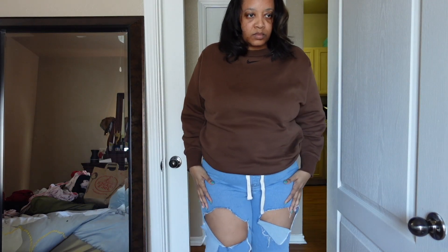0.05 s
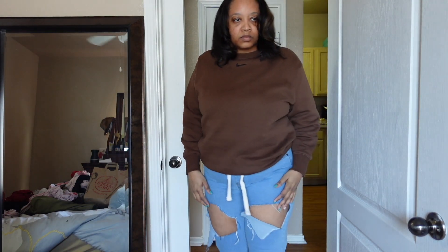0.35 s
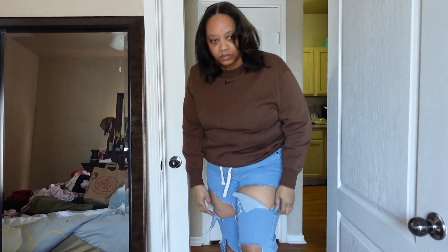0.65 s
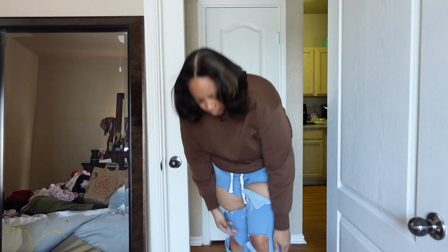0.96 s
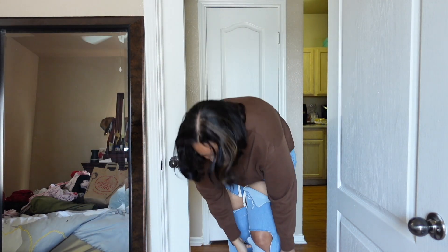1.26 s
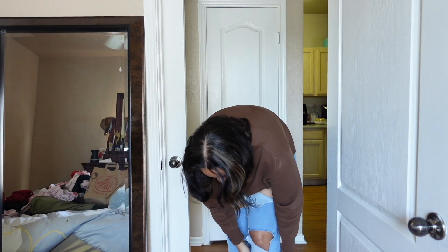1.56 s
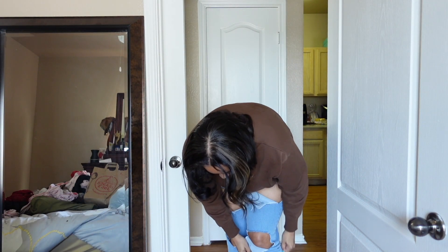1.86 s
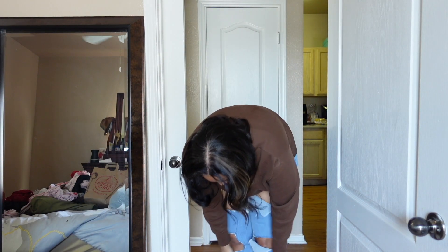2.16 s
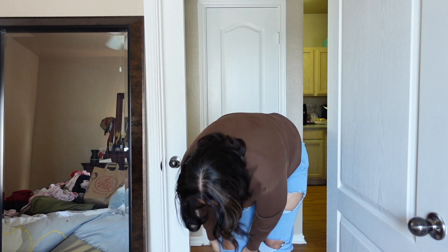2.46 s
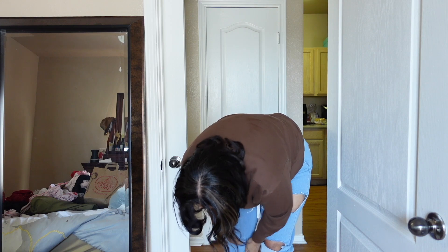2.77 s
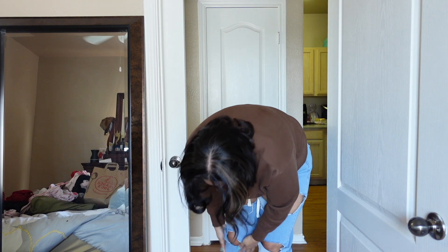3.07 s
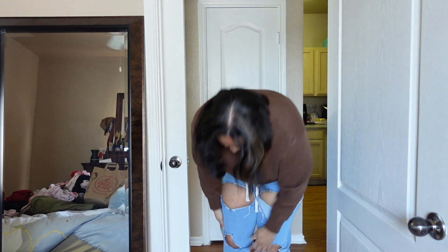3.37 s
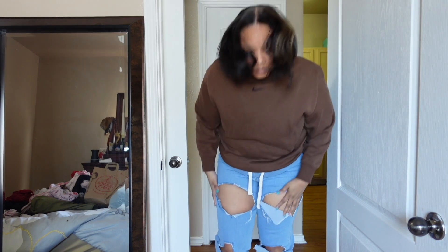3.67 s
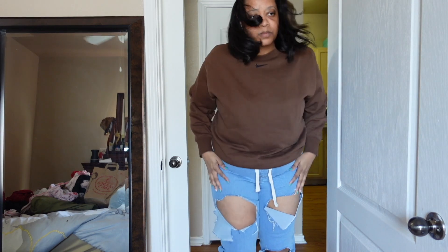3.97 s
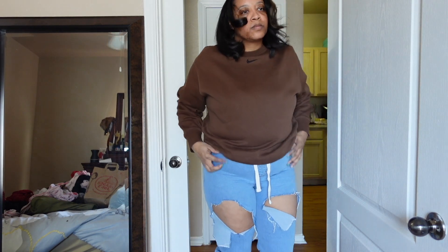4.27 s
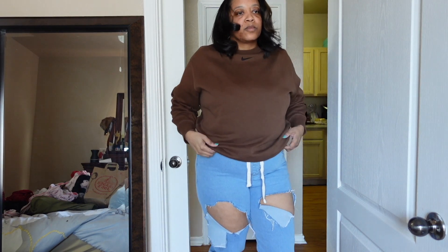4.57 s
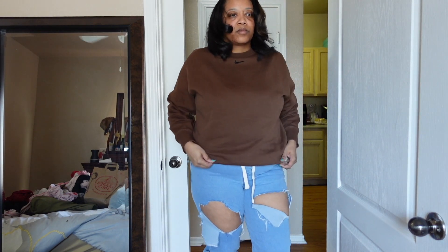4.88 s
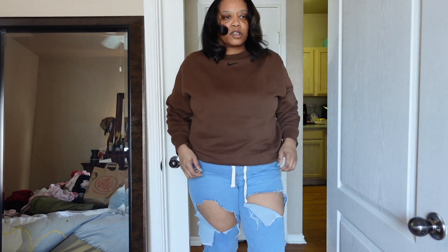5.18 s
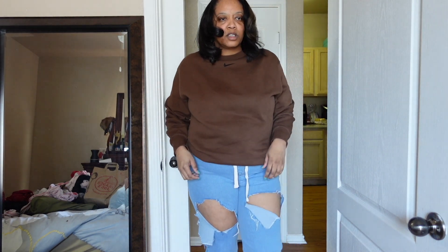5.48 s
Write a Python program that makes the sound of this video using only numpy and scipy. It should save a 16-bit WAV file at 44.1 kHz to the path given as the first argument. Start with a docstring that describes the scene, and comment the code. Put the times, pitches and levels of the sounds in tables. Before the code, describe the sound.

A brisk, loud swish of stiff fabric comes right at the start. Cloth keeps rubbing on cloth through the first second, with a crisp little snap of a fold at about 0.6 seconds. Someone in a sweatshirt and jeans bends and handles the trouser legs: loose cloth flaps near 1.4 seconds, and stronger rubs come around 1.8 and 2.8 seconds. A few faint, light knocks are scattered between 1.5 and 3.1 seconds. From about 3.4 to 4.5 seconds the rustling is fuller and more continuous, with airy swells of fabric hiss, ending in two small ticks. It dies down, and at about 5.1 seconds there is one sharp, wet click, like a tongue click or lip smack. A faint knock and a soft rustle follow around 5.5 seconds. A quiet, steady fan-like hiss lies underneath, and the small room adds a short echo.

```python
"""Cloth swishes and rubs as someone in a sweatshirt and jeans bends, handles the trouser legs and stands.
The rubbing is thousands of tiny clicks from threads catching and slipping. Loose cloth flaps, folds snap,
breath-like hiss swells and a few soft knocks ring. Near the end, tiny quick pops make one sharp, wet
click, like a tongue click or lip smack.
The walls of the small room answer briefly, and a fan-like hiss lies under it all."""
import sys
import numpy as np
from scipy import signal
from scipy.fft import rfft, irfft, next_fast_len
from scipy.io import wavfile
from scipy.ndimage import map_coordinates

SR = 44100
rng = np.random.default_rng(int(sys.argv[2]) if len(sys.argv) > 2 else 0)


def store_pcm(level_fs):
    """Save levels as 16-bit WAV."""
    pcm = np.round(np.clip(level_fs, -1, 1) * 32767).astype(np.int16)
    wavfile.write(sys.argv[1], SR, np.atleast_2d(pcm).T)


N = 248283

# Tone colours, or how strong each pitch is next to the others: pitch_hz, level_db
FAN_COLOUR = [(30, -41), (80, -22.5), (130, -15), (250, -13), (450, -8), (660, -3.5), (800, -5.5),
              (1100, 4), (1600, 2.5), (2200, -2), (2600, -6), (4500, -7), (9000, -12.5), (15800, -21)]  # steady room noise
SWISH_COLOUR = [(150, -67), (600, -18.5), (1100, -12), (1800, -8.5), (2300, -4), (2620, 1), (2850, -2),
                (3200, 0.5), (4200, -2), (5000, -10.5), (7200, -16), (10000, -24), (15500, -44)]  # stiff fabric swept briskly
SWISH_BODY_COLOUR = [(50, -48), (150, -26), (280, -15.5), (380, -6.5), (520, -0.5), (660, -5), (750, 10),
                     (860, -9), (1100, -2), (1600, -12), (6000, -50)]  # the hollow sound under that sweep
RUB_COLOUR = [(250, -69), (600, -36), (900, -21.5), (1300, -7), (1900, -0.5), (2900, -2.5), (4500, -5),
              (6500, -12.5), (9000, -23), (13000, -37)]  # cloth on cloth
FIBRE_COLOUR = [(500, -63), (3000, -1), (5500, -3), (7500, -3.5), (10000, -8), (13000, -12.5),
                (16000, -20.5)]  # taut fabric hissing
FLAP_COLOUR = [(50, -46), (140, -45), (280, -14.5), (450, -14.5), (700, 3), (1100, 1), (1600, 5.5),
               (2600, -1), (8000, -47)]  # loose fabric flapping

# Clothes shifting faintly as the body moves, resting just before the click: time_s, level_db
SHIFTING = [(0.3, -60), (0.7, -62.5), (1.1, -63), (1.3, -64), (2.5, -62.5), (3.05, -66), (4.3, -60),
            (4.85, -74), (5.05, -82), (5.36, -66.5), (5.63, -87)]
# Strokes of cloth on cloth: peak_s, rise_s, fall_s, rub_db, hiss_above_rub_db
STROKES = [(0.19, 0.059, 0.2, -49.5, -32), (0.42, 0.065, 0.064, -53.5, -14), (0.53, .05, 0.07, -48.5, -11),
           (0.635, 0.074, 0.034, -45, -11.5), (0.78, .022, 0.062, -49, -9.5), (0.93, 0.12, .17, -65, -1),
           (1.48, 0.096, 0.07, -64.5, 4), (1.72, 0.089, 0.084, -49.5, -2), (1.815, 0.071, 0.057, -49, -2),
           (2.0, .035, 0.05, -57.5, -11), (2.085, 0.049, .1, -57, -21), (2.29, 0.12, 0.28, -55.5, -12.5),
           (2.56, 0.12, 0.11, -59.5, 0), (2.825, 0.082, 0.075, -48, -1.5),
           (2.945, 0.025, 0.04, -51.5, -6.5), (3.2, 0.094, 0.075, -59.5, -1.5),
           (3.39, 0.091, 0.18, -56.5, 0), (3.51, .04, 0.056, -49, -5), (3.59, 0.083, 0.085, -47, -5),
           (3.73, 0.13, 0.11, -54.5, 0.5), (3.9, 0.11, 0.075, -56, 3.5), (4.11, 0.2, 0.1, -52.5, -5.5),
           (4.29, 0.15, .11, -51, -5), (4.47, 0.16, .05, -54.5, -18), (4.73, 0.16, 0.16, -63, -1),
           (5.62, 0.12, .08, -58, -15)]
# Flaps of loose cloth: peak_s, level_db
FLAPS = [(0.37, -59.5), (0.79, -58), (1.425, -51), (2.585, -58), (4.22, -62.5), (4.54, -61)]
# Breath-like swells of hiss in narrow bands: peak_s, spread_s, pitch_hz, width_hz, level_db
BREATHY_SWELLS = [(.17, 0.057, 268, 70, -71.5), (0.432, 0.056, 2420, 750, -50),
                  (1.453, 0.022, 500, 246, -61), (2.36, 0.024, 1310, 350, -56),
                  (2.603, 0.021, 694, 200, -64), (3.118, 0.03, 1180, 350, -61),
                  (3.583, 0.1, 2530, 1310, -49), (4.103, 0.049, 3930, 450, -53.5),
                  (4.135, 0.04, 1680, 300, -59), (4.19, 0.13, 3140, 300, -56.5),
                  (4.19, 0.046, 690, 90, -62), (4.287, 0.039, 282, 80, -76.5)]
# Folds snapping and small ticks: start_s, relative_level_db, pitch_hz, width_octaves
SNAPS = [(0.6302, -18.5, 3540, 0.8), (0.6381, -23.5, 3460, 0.96), (.6440, -33, 5500, 0.82),
         (0.65, -48, 5000, 1.1), (0.658, -44, 3800, 1.6), (2.935, -31, 3000, 1.1), (2.953, -42, 3200, 0.9),
         (4.4513, -29.5, 2470, 0.48), (4.5130, -26.5, 3750, 0.73), (5.0598, -37.5, 10800, 0.58),
         (5.1276, -33, 8000, 0.83)]
# Soft knocks: start_s, relative_level_db
KNOCKS = [(1.5659, -36), (1.573, -38), (1.9994, -43), (2.0718, -46), (2.157, -47), (2.519, -41),
          (2.533, -41), (3.0406, -43), (3.115, -41.5), (5.426, -46), (5.431, -41.5)]
# The tones in a knock, each fading by 60 dB in its ring time: pitch_hz, relative_level_db, ring_s
KNOCK_TONES = [(1154, -4.5, 0.081), (1402, 7, 0.017), (1750, 4, 0.026), (2045, -9, 0.095),
               (3200, -4.5, 0.024), (4270, 4, 0.0074)]
# The tiny quick pops that make up the wet click: start_s, relative_level_db
CLICK_POPS = [(5.1303, -19.3), (5.1322, -22.5), (5.1331, -14.5), (5.1359, -22.5), (5.1383, -17),
              (5.1404, -21.8), (5.143, -20.8)]
# The resonances (favoured pitches) that colour the click: pitch_hz, width_hz, gain_db
CLICK_RESONANCES = [(1410, 820, -8.5), (2210, 210, 1), (3000, 820, -7), (3800, 190, 6.5), (4220, 370, 3.5),
                    (4820, 185, 9.5), (5700, 340, 1), (6600, 370, -2), (7040, 490, -1), (8260, 680, 1.5),
                    (8900, 420, -1.5), (9900, 490, -1.5), (13200, 1200, -12.5), (14900, 1300, -17)]

# How long the room's echo takes to fade by 60 dB: pitch_hz, fade_s
ROOM_FADE = [(300, .32), (2000, .26), (5000, .28), (9000, .25), (15000, .21)]
# Stereo width, set by the side signal (what differs between left and right): pitch_hz, side_gain_db
STEREO_WIDTH = [(60, -10), (110, -9), (200, -6), (700, -5.5), (1300, -7.5), (2300, -14.5), (4200, -25.5),
                (8000, -27.5), (15000, -44)]


def amp(db):
    """Turn decibels into a number to multiply by."""
    return 10 ** (np.asarray(db) / 20)


def unit(x):
    """Scale x to an average power of 1."""
    return x / np.sqrt(np.mean(x ** 2) + 1e-20)


def along(points, hz):
    """Read between the rows of a (pitch_hz, value) table, on a log pitch scale."""
    pitches, values = np.transpose(points)
    return np.interp(np.log(hz + 1), np.log(pitches), values)


def wobble(per_s):
    """A smooth curve through per_s random values a second."""
    points = rng.standard_normal(int(N * per_s / SR) + 4)
    return map_coordinates(points, [np.arange(N) * per_s / SR])


def swell(peak_s, rise_s, fall_s, shape=1.5):
    """One movement speeds up to a peak and slows again; shape 1 is pointed, 2 is a bell."""
    t = np.arange(N) / SR - peak_s
    return np.exp(-np.abs(t / np.where(t < 0, rise_s, fall_s)) ** shape)


def filtered(x, response):
    """Turn each pitch in x up or down by response(hz)."""
    n = x.shape[-1]
    padded = next_fast_len(n + SR // 4)
    return irfft(rfft(x, padded) * response(np.fft.rfftfreq(padded, 1 / SR)), padded)[..., :n]


def coloured(x, colour):
    """Give x a tone colour and an average power of 1."""
    return unit(filtered(x, lambda hz: amp(along(colour, hz))))


def narrow(pitch_hz, width_hz):
    """Two noises (middle and side) in one narrow band of pitch."""
    def band(hz):
        return (hz * width_hz) ** 2 / ((pitch_hz ** 2 - hz ** 2) ** 2 + (hz * width_hz) ** 2)
    return unit(filtered(rng.standard_normal((2, N)), band))


def room(x, echo_db, build_s=0.017):
    """Middle and side: x sits in the middle; the walls' echo builds up and dies sooner in the treble."""
    hz, t, noise = signal.stft(rng.standard_normal((2, SR // 2)), SR, nperseg=256)
    fade = np.exp(-np.log(1000) * t / along(ROOM_FADE, hz)[:, None])
    tail = signal.istft(noise * fade * (1 - np.exp(-t / build_s)), SR, nperseg=256)[1]
    echo = signal.fftconvolve(x[None], tail / np.linalg.norm(tail[0]), axes=1)[:, :N]
    return amp(echo_db) * echo + np.array([x, np.zeros(N)])


def fan():
    """Steady airy noise with one narrow band that wavers in level."""
    hiss = amp(-60.5) * coloured(rng.standard_normal((2, N)), FAN_COLOUR)
    band = narrow(pitch_hz=2050, width_hz=270)
    return hiss + amp(-63.5 + 1.8 * wobble(per_s=14)) * band


def friction(per_s, spread_db, echo_db=3):
    """Threads catch and slip: a crowd of tiny clicks of uneven size, blurred by the room."""
    caught = rng.random(N) < per_s / SR
    sizes = amp(spread_db * np.minimum(rng.exponential(size=N), 4))
    return unit(room(caught * sizes * rng.standard_normal(N), echo_db))


def swish(peak_s=0.014, body_lag_s=0.042):
    """A brisk, loud sweep over stiff fabric; its hollow body peaks later and lasts longer."""
    rub_level = amp(-30.5 + 0.72 * wobble(per_s=66)) * swell(peak_s, rise_s=0.12, fall_s=0.1)
    body_level = amp(-53) * swell(peak_s + body_lag_s, rise_s=0.099, fall_s=0.18)
    rub = coloured(friction(per_s=16000, spread_db=1.5, echo_db=-0.5), SWISH_COLOUR)
    body = coloured(friction(per_s=6000, spread_db=2, echo_db=-7.5), SWISH_BODY_COLOUR)
    return rub_level * rub + body_level * body


def cloth():
    """Each stroke rubs cloth on cloth; taut fabric hisses, loose fabric flaps. Their powers add."""
    shifting_db = np.interp(np.arange(N) / SR, *np.transpose(SHIFTING))
    rub_power, fibre_power = amp(shifting_db) ** 2, amp(shifting_db - 2) ** 2
    for peak_s, rise_s, fall_s, rub_db, hiss_db in STROKES:
        stroke = amp(rub_db) * swell(peak_s, rise_s, fall_s)
        rub_power += stroke ** 2
        fibre_power += (amp(hiss_db) * stroke) ** 2
    flutter = amp(-64) * (np.sqrt(rub_power) / amp(-55)) ** 0.4  # grows 0.4 dB for each dB of rubbing
    flap_power = flutter ** 2
    for peak_s, db in FLAPS:
        flap_power += (amp(db) * swell(peak_s, rise_s=0.046, fall_s=0.098)) ** 2
    grip = amp(1.02 * wobble(per_s=45))  # the hand's pressure is never even
    rub = grip * np.sqrt(rub_power) * coloured(friction(per_s=10000, spread_db=1.5), RUB_COLOUR)
    fibres = grip * np.sqrt(fibre_power) * coloured(friction(per_s=9000, spread_db=0.5), FIBRE_COLOUR)
    flap = np.sqrt(flap_power) * coloured(friction(per_s=3000, spread_db=-1), FLAP_COLOUR)
    return rub + fibres + flap


def breathy_swells():
    """Soft, hollow, breath-like swells of hiss, each in its own narrow band."""
    t = np.arange(N) / SR
    return sum(amp(db) * np.exp(-((t - peak_s) / spread_s) ** 2 / 2) * narrow(pitch_hz, width_hz)
               for peak_s, spread_s, pitch_hz, width_hz, db in BREATHY_SWELLS)


def add(track, start_s, sound):
    """Mix a short sound into the track."""
    part = track[round(start_s * SR):][:len(sound)]
    part += sound[:len(part)]


def snaps(fade_s=0.00099):
    """A fold gives way within a millisecond: one spike and a little crumple."""
    track, t = np.zeros(N), np.arange(SR // 50) / SR
    lead = SR // 100  # silence in front for the filter to spread into
    for start_s, db, pitch_hz, octaves in SNAPS:
        crumple = 0.5 * rng.standard_normal(len(t)) * np.exp(-t / fade_s)
        snap = np.pad((t == 0) + crumple, (lead, 0))
        snap = filtered(snap, lambda hz: np.exp(-(np.log2((hz + 1) / pitch_hz) / octaves) ** 2 / 2))
        add(track, start_s - lead / SR, amp(db + 6.5) * snap / np.linalg.norm(snap))
    return room(track, echo_db=-5)


def ring(tones, t, rise_s=0.0003):
    """A struck thing rings with fading tones, a little different on every hit."""
    hz, db, ring_s = np.transpose(tones)[:, :, None]
    strength = amp(db + rng.normal(0, 0.97, hz.shape))
    fade = np.exp(-np.log(1000) * t / ring_s)
    waves = np.sin(2 * np.pi * (hz * t + rng.random(hz.shape)))
    return (strength * fade * waves).sum(axis=0) * (1 - np.exp(-t / rise_s))


def knocks(bass_cut_hz=700):
    """Soft, quickly fading knocks on something too small to give bass."""
    track, t = np.zeros(N), np.arange(SR // 10) / SR
    for start_s, db in KNOCKS:
        add(track, start_s, amp(db - 8.5) * ring(KNOCK_TONES, t))
    return room(filtered(track, lambda hz: hz ** 3 / (hz ** 3 + bass_cut_hz ** 3)), echo_db=-4)


def wet_click(fade_s=0.0035, wall_delay_s=0.0215, wall_db=-14, bass_cut_hz=800):
    """Like a tongue click or lip smack: tiny quick pops ring brightly, and one wall throws them back."""
    pops, t = np.zeros(N), np.arange(SR // 20) / SR
    for start_s, db in CLICK_POPS:
        pop = amp(db - 3) * rng.standard_normal(len(t)) * np.exp(-t / fade_s)
        add(pops, start_s, pop)
        add(pops, start_s + wall_delay_s, amp(wall_db) * pop)

    def resonances(hz):
        peaks = sum((-1) ** k * amp(db) * 1j * hz * width / (pitch ** 2 - hz ** 2 + 1j * hz * width)
                    for k, (pitch, width, db) in enumerate(CLICK_RESONANCES))
        return peaks * (1j * hz / (1j * hz + bass_cut_hz)) ** 2  # too small to give off bass
    return room(filtered(pops, resonances), echo_db=-5, build_s=0.0037)


def stereo(pair):
    """Turn middle and side into left and right: narrow in the treble, wider below."""
    middle, side = pair[0], filtered(pair[1], lambda hz: amp(along(STEREO_WIDTH, hz)))
    return np.array([middle + side, middle - side])


def scene():
    """All the sounds together, just right of the middle."""
    mix = fan() + swish() + cloth() + breathy_swells() + snaps() + knocks() + wet_click()
    return stereo(mix) * amp([[-0.3], [0.3]])


def record(dry, bass_cut_hz=60, top_hz=15850):
    """Thin the deep bass and keep nothing above top_hz."""
    return filtered(dry, lambda hz: hz / np.hypot(hz, bass_cut_hz) * (hz < top_hz))


dry = scene()
out = record(dry)
store_pcm(out)
```